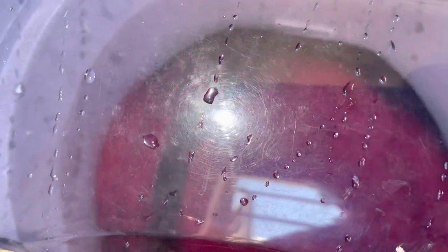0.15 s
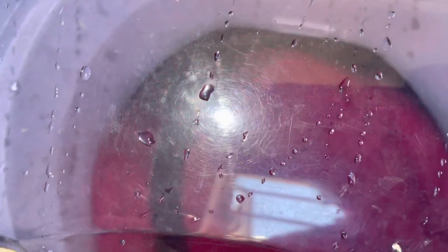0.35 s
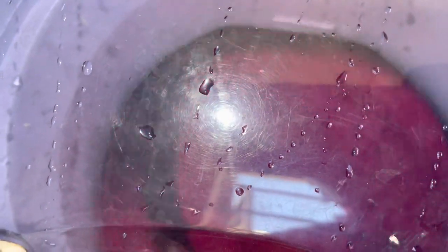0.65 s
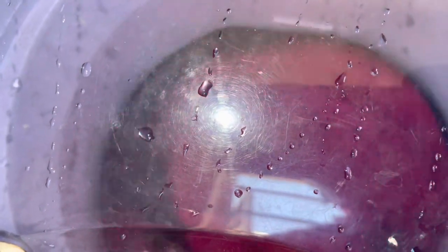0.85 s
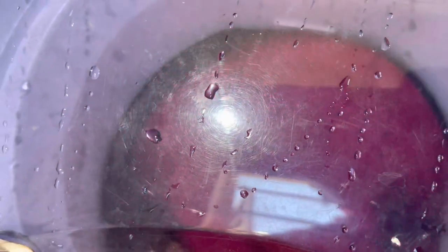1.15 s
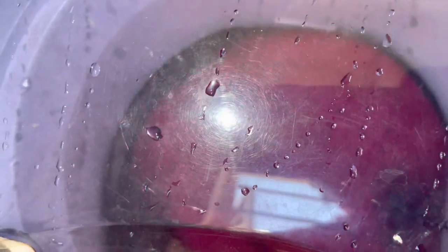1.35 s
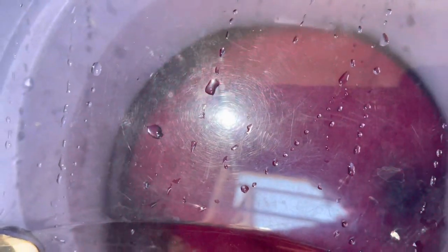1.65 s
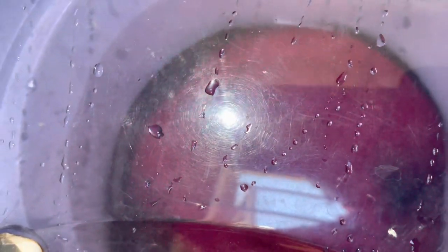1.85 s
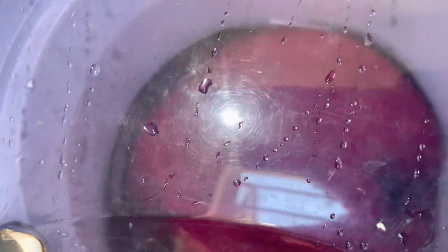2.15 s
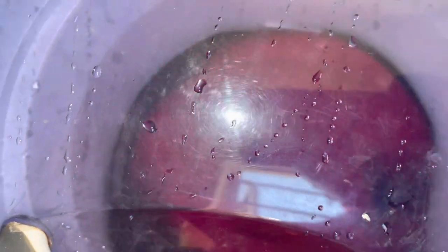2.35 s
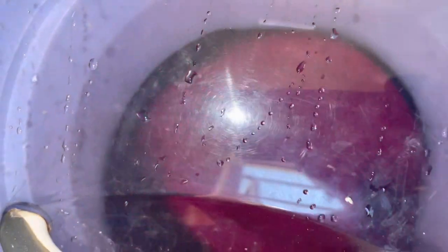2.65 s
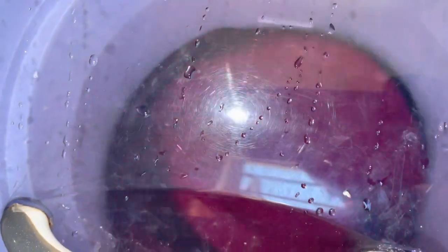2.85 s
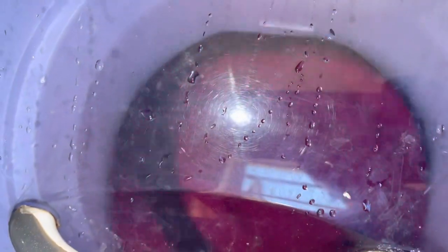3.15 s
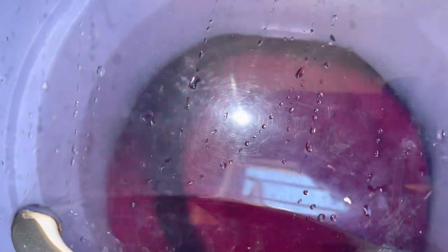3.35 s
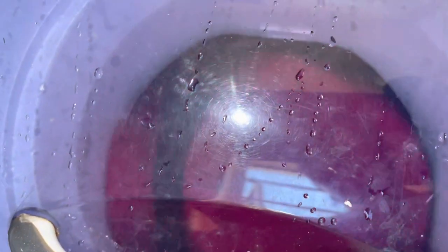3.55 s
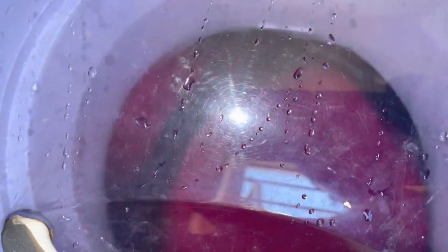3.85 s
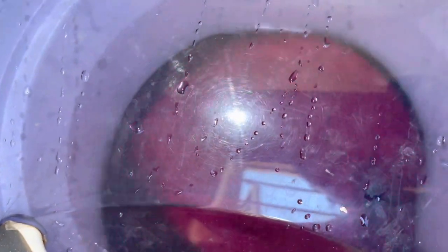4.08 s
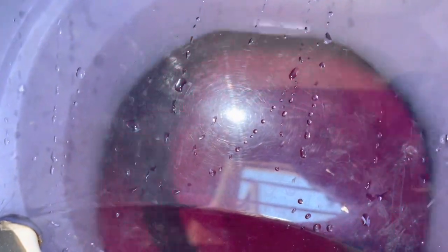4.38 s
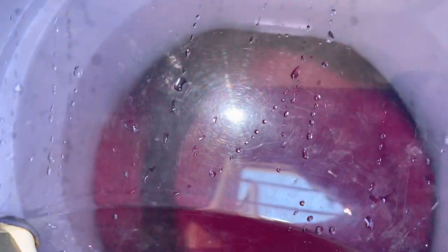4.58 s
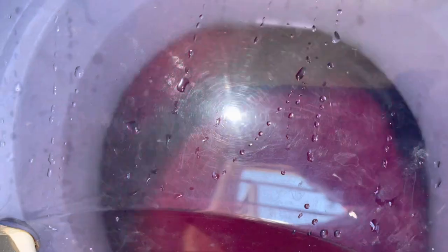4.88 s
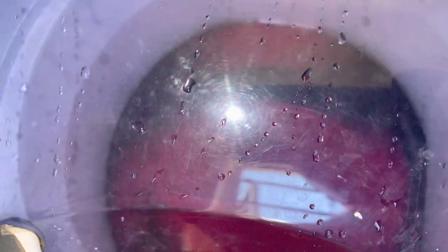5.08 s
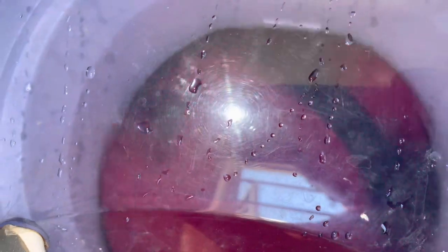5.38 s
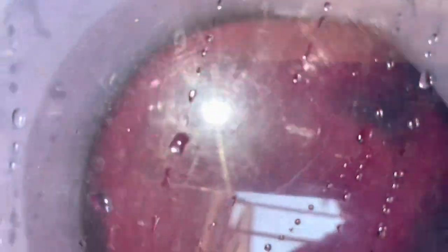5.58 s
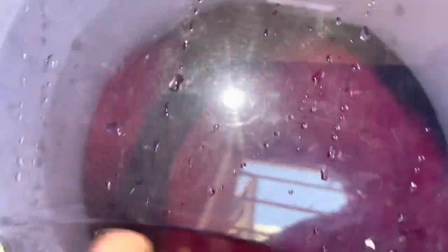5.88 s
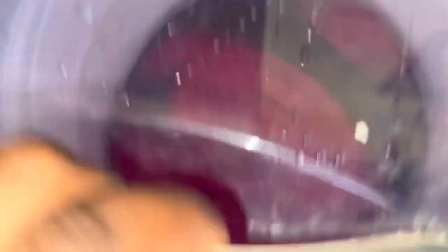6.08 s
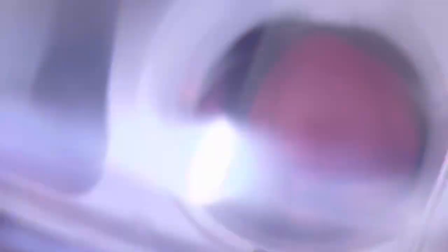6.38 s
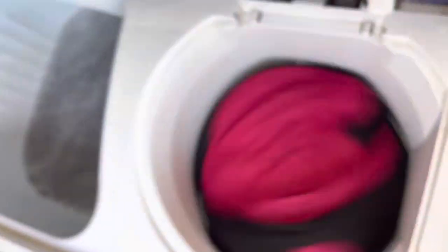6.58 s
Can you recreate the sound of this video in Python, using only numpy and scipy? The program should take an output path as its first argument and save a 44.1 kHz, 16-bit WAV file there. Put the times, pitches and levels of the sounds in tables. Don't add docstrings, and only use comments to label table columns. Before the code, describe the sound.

From 0 seconds, a small plastic washer's spin tub is heard very close over its lid, already turning about ten times a second with a wet, lopsided load. The cabinet gives a low throbbing buzz that sinks slightly in pitch, with hollow plastic knocks repeating every turn. A fast clockwork timer, about forty ticks a second, rattles strong-weak in thin metal, over low air rumble and soft, pulsing hiss. A small click comes near 2.2 and another near 5.25. At about 5.45 the sound dips and cuts to a slower, less even drum. Soft hand booms on the cabinet follow, strongest around 5.8 to 6.0, then latch clicks from 6.1. The ticking stops near 6.3 as the lid thumps open, with a sharper second thump at 6.4, scrapes and dry clicks. The buzz drops away and the brake rubs in low lumps until the end, around 6.7, with brighter air.

```python
import sys
import numpy as np
from scipy import signal
from scipy.fft import rfft, irfft, next_fast_len
from scipy.io import wavfile

SR = 44100
rng = np.random.default_rng(int(sys.argv[2]) if len(sys.argv) > 2 else 0)


def master_out(mix):
    frames = np.transpose(np.atleast_2d(mix))
    ceiling = np.clip(frames, -1, 1)
    pcm = np.round(ceiling * 32767).astype(np.int16)
    wavfile.write(sys.argv[1], SR, pcm)


def makeup_ratio(level_db):
    decades = np.asarray(level_db, float) / 20
    return 10 ** decades


N = 296352
T = np.arange(N) / SR
STEP = 16
COARSE = T[::STEP]
CUT_S = 5.446

# reference time in seconds, turns made by then, speed in turns per second,
# half of the speed lost per second.
SPIN = [
    (0, -.030, 10.3047, .07738),
    (5.76, .44, 8.7, .4),
]
# frequency in Hz, lead of the left port in radians, likeness from 0 to 1,
# left over right in dB.
PORTS = [(40, -.1, .98, 0), (150, -.1, .985, .4), (300, -.15, .94, 1), (450, -1, .75, 3),
         (600, -2.7, .5, -1), (900, -2.7, .5, 0), (1290, -7.4, .4, -3), (1640, -5.8, .3, -2),
         (2200, -7.3, .2, 2), (2900, -8.3, .6, 0), (3800, -7, .2, 0), (4800, -8.6, .55, -2),
         (7300, -4.7, .6, 0), (10500, -2, .8, 0), (11400, -1, .85, 0), (5800, -6.28, .95, 0),
         (6300, -6.28, .95, 0), (8600, -3.14, .93, 0), (9650, -3.14, .94, 0), (12500, 0, .97, 0)]


def rms_one(x):
    return x / np.sqrt(np.mean(x ** 2) + 1e-20)


def in_time(rows, t=COARSE):
    s, *columns = np.transpose(rows)
    return [np.interp(t, s, column) for column in columns]


def at_hz(points, hz, axis=1):
    points = np.array(sorted(points))
    return np.interp(np.log(hz), np.log(points[:, 0]), points[:, axis])


def drift(rate_hz):
    r = np.exp(-2 * np.pi * STEP * rate_hz / SR)
    noise = rng.standard_normal(len(COARSE) + 3000)
    return rms_one(signal.lfilter([1], [1, -2 * r, r * r], noise)[3000:])


def ring(clicks, hz, t60):
    r, w = makeup_ratio(-60 / (t60 * SR)), 2 * np.pi * hz / SR
    return signal.lfilter([0, np.sin(w)], [1, -2 * r * np.cos(w), r * r], clicks + 1e-18)


def whole_steps(count):
    return np.flatnonzero(np.diff(np.floor(count)) == 1)


def by_frequency(x, response):
    size = next_fast_len(N + 4096)
    hz = np.maximum(np.arange(size // 2 + 1) * SR / size, 1)
    return irfft(rfft(x, size) * response(hz), size)[..., :N]


def add_at(out, s, sound):
    start = round(s * SR)
    out[start:start + len(sound)] += sound


def drum_turns():
    before, after = [turns + speed * (T - s) - slowing * (T - s) ** 2 for s, turns, speed, slowing in SPIN]
    return np.where(T < CUT_S, before, after)


def shake(turns, lead=0.93, scatter=0.0004, wander=0.15, loose=0.65, slip=.29, gather_s=3.98, gather_lag=0.57):
    # multiple of drum speed, level in dB in mid-coast, dB gained per second as the pitch slides.
    orders = [(6, -35.3, -.2), (7, -42, -1.4), (8, -49, -3.3), (10, -44.5, .5), (11, -42.5, -1.1),
              (12, -34, -1.4), (13, -52, 1.2), (14, -33.5, -.5), (15, -50, 0), (16, -38.7, 0),
              (17, -48.5, 2.5), (18, -43, .8), (19, -39, -.4), (20, -43, -1.2), (21, -41.5, 1),
              (22, -46, 0), (23, -48.5, -2), (24, -40.5, -2.8), (25, -43, -2.4), (26, -46.5, -.6),
              (27, -50, 1.5), (28, -48.5, -2.8), (29, -47, 2.4), (33, -45, 0), (34, -43, -.8),
              (35, -40, -1.4), (36, -44, .5), (37, -40.5, -1.1), (39, -45, -.8), (47, -50, 2)]
    # frequency in Hz, half width in Hz, boost in dB, lag in radians.
    panels = [(60, 9, 0, 2.2), (80, 5, 0, 2.5), (139.5, 5.5, 8.5, 1.4), (187, 4.5, 6, 1.4), (250, 8, 1, 0)]
    mid_coast_s, thump_turn = 2.7, .963
    slow_db, slow_bass_db = -3, -18
    coast, slow = np.minimum(COARSE, 5.0), COARSE > CUT_S
    speed = SPIN[0][2] - 2 * SPIN[0][3] * coast
    out = 0
    for multiple, level_db, slide_db in orders:
        order = round(multiple)
        boost_db, lag = 0, 0
        for hz, width, panel_db, panel_lag in panels:
            nearness = 1 / (1 + ((order * speed - hz) / width) ** 2)
            boost_db = boost_db + panel_db * nearness
            lag = lag + panel_lag * nearness
        stray = lead - lag + scatter * order ** 2.418 * rng.standard_normal()
        stray = stray + (wander + loose * slow) * drift(1.8)
        if order > 15:
            stray = stray + slip * np.sqrt(abs(order - 13)) * np.abs(coast - gather_s) - gather_lag
        angle = 2 * np.pi * order * (turns[::STEP] - thump_turn) + stray
        order_db = level_db + slide_db * (coast - mid_coast_s) + boost_db
        order_db = order_db + slow_bass_db * (order < 8) * slow
        out = out - makeup_ratio(order_db) * np.cos(angle)
    after_db = np.interp(COARSE, [CUT_S, CUT_S, 6.15, 6.35], [0, slow_db, slow_db, -40])
    return signal.resample_poly(np.sqrt(2) * makeup_ratio(after_db) * out, STEP, 1)[:N]


def contacts(turns, spread_db=1.5, jitter_s=.0002):
    # place in the turn, frequency in Hz, t60 in seconds, level in dB,
    # turns per second lost when it bites hardest.
    knocks = [(.66, 452, .045, -24, 0.51), (.48, 440, 0.039, -27.5, 0.26), (0.054, 373, 0.046, -29, 0.81),
              (.52, 573, 0.031, -19.5, 0.059), (.54, 550, .035, -25, 0.63), (.70, 670, .076, -32, .02),
              (0.41, 670, 0.095, -38, 1.1), (.65, 787, 0.045, -27, 0.12), (.62, 805, 0.04, -25.5, 0.48),
              (0.036, 1046, 0.094, -31, 0.12), (.44, 1215, 0.068, -31.5, 0.57),
              (0.32, 1215, .054, -27.5, 1.8), (.05, 1210, .041, -34, .05), (0, 1210, 0.038, -40, 0.79),
              (.099, 1600, 0.042, -30.5, 0.28), (.55, 877, 0.03, -22.5, .05), (.55, 853, 0.036, -24, 0.68),
              (0.33, 535, 0.098, -27, 0.11), (.84, 1574, 0.026, -31, 0.41), (.30, 317, 0.014, -21, 0.77),
              (.30, 310, 0.014, -15.5, 1.4), (.42, 2800, 0.033, -31.5, 0.38),
              (.43, 1075, 0.057, -30.5, 0.72), (0.31, 1053, 0.064, -33, 0.045)]
    bite_width = 0.18
    out, lost = np.zeros(N), SPIN[0][2] - np.gradient(turns) * SR
    for place, hz, t60, level_db, best in knocks:
        at = whole_steps(turns - place)
        at = at[T[at] < 6.27]
        luck = rng.standard_normal((len(at), 2))
        bite = 1 / np.hypot(1, (lost[at] - best) / bite_width)
        jitter = (jitter_s * SR * luck[:, 1]).astype(int)
        clicks = np.zeros(N)
        clicks[np.clip(at + jitter, 0, N - 1)] = makeup_ratio(level_db + spread_db * luck[:, 0]) * bite
        out += ring(clicks, hz, t60)
    return out


def lid(click_db=-5, click_s=0.0026):
    # start in seconds, level in dB, frequency in Hz, t60 in seconds, rise in seconds.
    booms = [(5.47, -20, 560, 0.093, .004), (5.475, -19, 262, 0.21, 0.012),
             (5.55, -17.5, 311, 0.12, 0.0096), (5.83, -12, 250, 0.083, 0.0042),
             (5.875, -15, 130, 0.18, 0.0091), (5.975, -13, 473, 0.029, .002),
             (6.05, -17.5, 395, 0.072, 0.0071), (6.0, -15, 79, .12, .006), (6.29, -27, 377, 0.15, 0.0061),
             (6.49, -17, 86, 0.09, .006), (6.67, -32, 670, 0.08, 0.0067), (6.44, -19, 434, 0.057, .004),
             (6.3955, -13.5, 590, 0.023, 0.0011), (6.565, -29, 360, 0.067, .005),
             (6.644, -14, 150, 0.054, 0.0028)]
    # start in seconds, level in dB, frequency in Hz.
    dry_clicks = [(2.158, -25, 1540), (5.247, -19, 6660), (5.869, -21, 2570), (6.1028, -22, 2280),
                  (6.1489, -20, 6600), (6.1755, -21, 2900), (6.2028, -26, 6050), (6.2243, -19, 7000),
                  (6.255, -33, 3040), (6.2843, -22, 1740), (6.3038, -23, 2380), (6.3558, -16, 2170),
                  (6.3877, -28, 1820), (6.3955, -19, 1100), (6.44, -23, 2260), (6.4896, -26, 2900),
                  (6.5028, -13, 6100), (6.5706, -16, 5490), (6.6006, -16, 5490), (6.6538, -16.5, 6300)]
    out, age = np.zeros(N + 9000), np.arange(9000) / SR
    for s, db, hz, t60, rise in booms:
        shape = makeup_ratio(db - 60 * age / t60) * (1 - np.exp(-age / rise))
        add_at(out, s, shape * np.sin(2 * np.pi * hz * age))
    for s, db, hz in dry_clicks:
        band = signal.butter(1, [hz * 0.66, min(hz * 2.1, 13000)], "band", fs=SR, output="sos")
        noise = rms_one(signal.sosfilt(band, rng.standard_normal(9000)))
        add_at(out, s, makeup_ratio(db + click_db) * noise * np.exp(-age / click_s))
    return out[:N]


def thumps():
    # start in seconds, level in dB, first Hz, last Hz, time of the drop in seconds, t60 in seconds.
    landings = [
        (6.3235, -8.5, 230, 74, .004, .11),
        (6.3955, -8, 800, 74, .003, .075),
    ]
    out, age = np.zeros(N + 9000), np.arange(9000) / SR
    for s, db, first_hz, last_hz, drop, t60 in landings:
        cycles = last_hz * age + (first_hz - last_hz) * drop * (1 - np.exp(-age / drop))
        shape = makeup_ratio(db - 60 * age / t60) * (1 - np.exp(-age / .0012))
        add_at(out, s, shape * np.sin(2 * np.pi * cycles))
    return out[:N]


def brake(lumpy_db=2.5):
    # time in seconds, level of the rub in dB.
    rub = [
        (5.45, -63),
        (5.9, -51.5),
        (6.2, -41),
        (6.35, -46),
        (6.5, -40.5),
        (6.6, -39),
        (6.72, -44),
    ]
    # frequency in Hz, width in Hz, level in dB.
    rub_modes = [(50, 30, -9), (144, 45, 2.5), (390, 90, 0), (555, 90, 2.5)]
    rub_db, = in_time(rub)
    out = np.zeros(N)
    for hz, width, db in rub_modes:
        t60 = np.log(1000) / np.pi / width
        mode = makeup_ratio(db) * rms_one(ring(rng.standard_normal(N), hz, t60))
        out += mode * np.interp(T, COARSE, makeup_ratio(rub_db + lumpy_db * drift(9.8)))
    return out * (T > CUT_S)


def timer(limp=0.014, spread_db=0.5, burst_s=0.0034):
    # time in seconds, beats it runs ahead.
    spring = [(0, -.31), (.4, -.44), (1.2, -.37), (1.7, -.24), (2.15, -.53), (2.5, -.39), (3.25, -.44),
              (4.0, -.8), (4.18, -.79), (4.5, -.17), (5.25, 1.14), (5.4, 1.28), (5.9, 1.43), (6.3, 1.31)]
    # time in seconds, strong beat in dB, weak beat relative to it in dB.
    tick_levels = [(0, -26.5, -0.5), (1, -27, -1.5), (2, -25, -3.5), (3, -26.5, -1.5), (4, -26, -2),
                   (4.5, -22.5, -2), (5.4, -23.5, -6.5), (5.6, -26, -3.5), (6.2, -25, -4), (6.3, -40, 4)]
    # frequency in Hz, level in dB, t60 in seconds.
    metal_modes = [(2655, -2, 0.01), (3820, -2, 0.0066), (5900, 0.5, 0.0054), (6540, 2, 0.0073),
                   (7640, -4, 0.0026), (8205, -3.5, 0.022), (10300, 7.5, 0.0033), (11320, 0, 0.0086),
                   (13200, -50, 0.012)]
    beats_per_s, stop_s = 39.6, 6.3
    beats = beats_per_s * np.minimum(T, stop_s) + in_time(spring, T)[0]
    at = whole_steps(beats - limp * np.cos(np.pi * beats))
    strong_db, weak_db = in_time(tick_levels, T[at])
    weak = np.round(beats[at]) % 2 == 0
    hits = np.zeros(N)
    hits[at] = makeup_ratio(strong_db + weak * weak_db + spread_db * rng.standard_normal(len(at)))
    age = np.arange(-100, 600) / SR + .0023
    burst = rms_one(age * np.exp(-2 * age / burst_s)) / np.sqrt(700)
    rattle = np.roll(np.convolve(hits, burst)[:N], -100)
    return sum(makeup_ratio(db) * ring(rattle * rng.standard_normal(N), hz, t60) for hz, db, t60 in metal_modes)


def air_levels(scuff_s=0.025):
    # time in seconds, rumble in dB.
    hand = [
        (5.45, -25),
        (5.6, -31),
        (5.68, -29.5),
        (5.9, -26.5),
        (6.2, -28),
        (6.27, -31),
        (6.55, -33.5),
        (6.72, -42),
    ]
    # time in seconds, low swell in dB, high swell in dB.
    scuffs = [
        (6.31, 9, 7),
        (6.44, 7, 9),
        (6.59, 2, 4),
    ]
    slow, (hand_db,) = COARSE > CUT_S, in_time(hand)
    low, high = 0, 0
    for s, low_db, high_db in scuffs:
        swell = np.clip(1 - np.abs(COARSE - s) / scuff_s, 0, 1)
        low = low + low_db * swell
        high = high + high_db * swell
    thinner = slow * (-0.5 - 1.8 * (COARSE - CUT_S))
    rumble = np.where(slow, hand_db, -31 - 0.8 * COARSE) + low
    return rumble, -38.5 + thinner + low, -36.5 + thinner + high


def air(turns, once_db=0.13, twice_db=2.0, patchy_db=1.88):
    # frequency in Hz, level in dB per Hz.
    colour = [(35, -16), (60, -3.5), (130, -5.5), (230, -6.5), (400, -5.5), (620, -5.5), (900, -6.5),
              (1400, -15), (1900, -17.5), (2800, -14.5), (4500, -22), (8000, -23.5), (11000, -15.5),
              (13500, -38.5)]
    open_s, open_db, open_top_db = 6.45, -0.5, 4.5
    rumble, rush, hiss = air_levels()
    turns = turns[::STEP]
    swell = once_db * np.cos(2 * np.pi * (turns - .6)) + twice_db * np.cos(4 * np.pi * (turns - .45))
    opened = np.clip((COARSE - open_s) / 0.04, 0, 1)
    edges, together = 40 * 2 ** np.arange(0, 8.7, 1 / 3), drift(38)
    white = rng.standard_normal((2, 2, N))
    out = 0
    for k, (low, high) in enumerate(zip(edges, edges[1:])):
        hz = np.sqrt(low * high)
        sos = signal.butter(2, [low, high], "band", fs=SR, output="sos")
        band = signal.sosfilt(sos, white[k % 2])
        if hz < 500:
            level_db = rumble + 18
        elif hz < 2000:
            level_db = rush + 22
        else:
            level_db = hiss + 23
        level_db = level_db + (open_db * (700 < hz < 4500) + open_top_db * (hz > 9000)) * opened
        patches_db = patchy_db * (0.21 * together + drift(45))
        gain = makeup_ratio(at_hz(colour, hz) + level_db + swell + patches_db)
        out = out + np.interp(T, COARSE, gain) * band

    def likeness(hz):
        return np.sqrt(1 + np.clip(at_hz(PORTS, hz, axis=2), 0, 1) * [[1], [-1]])
    mid, side = by_frequency(out, likeness)
    return np.array([mid + side, mid - side])


def echoes(x, t60=0.11, cut_hz=2700):
    age = np.arange(int(.25 * SR)) / SR
    tail = rng.standard_normal((2, len(age))) * makeup_ratio(-60 * age / t60) * (age > .003)
    tail = signal.sosfilt(signal.butter(2, [250, cut_hz], "band", fs=SR, output="sos"), tail)
    tail = tail / np.sqrt(np.sum(tail ** 2) / 2)
    return signal.fftconvolve(x[None], tail, axes=1)[:, :N]


def scene(fade_s=.024):
    turns = drum_turns()
    solid = contacts(turns) + lid() + brake() + timer()
    sound = shake(turns) + solid + thumps() + air(turns) + makeup_ratio(-7.5) * echoes(solid)
    return sound * np.clip(np.abs(T - CUT_S) / fade_s, .04, 1) ** 1.18


def roll_off(x):
    return signal.sosfilt(signal.butter(12, 15710, fs=SR, output="sos"), x)


def record(dry, low_hz=32, top_hz=12900, top_slope=27.0, edge_hz=15200):
    def ports(hz):
        half = makeup_ratio(at_hz(PORTS, hz, axis=3) / 2) * np.exp(.5j * at_hz(PORTS, hz))
        trim = (1 + (hz / top_hz) ** top_slope) * (1 + (hz / edge_hz) ** 30) * (1 + (low_hz / hz) ** 6)
        return np.array([half, 1 / half]) / np.sqrt(trim)
    return roll_off(by_frequency(dry, ports))


dry = scene()
out = record(dry)
master_out(out)
```